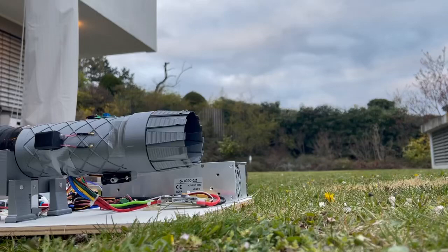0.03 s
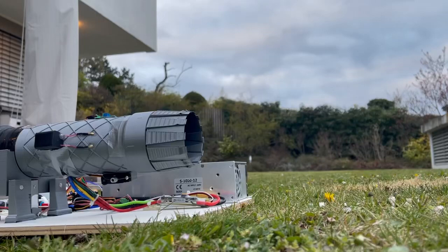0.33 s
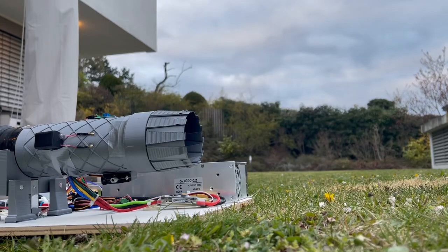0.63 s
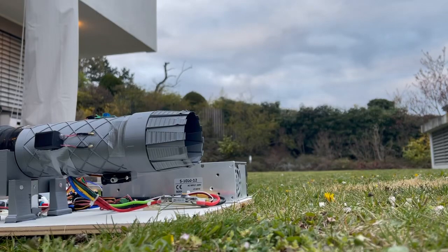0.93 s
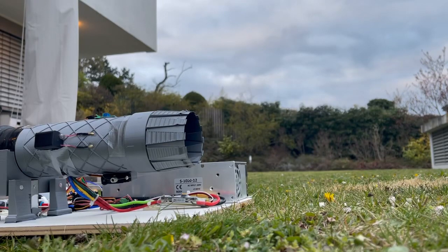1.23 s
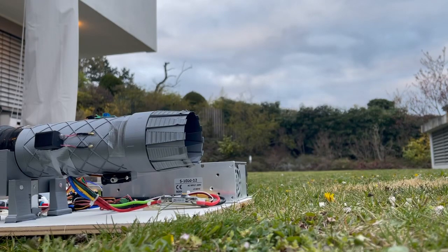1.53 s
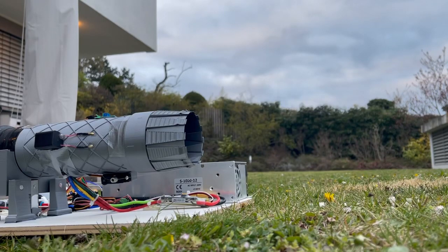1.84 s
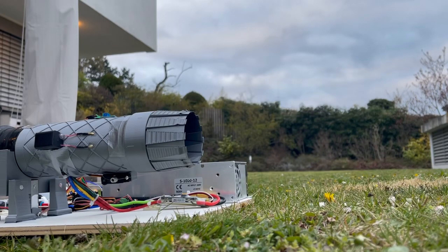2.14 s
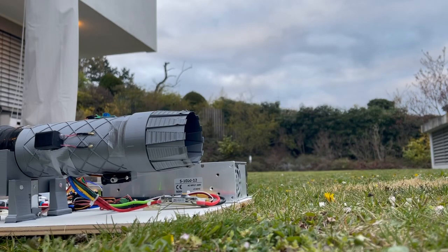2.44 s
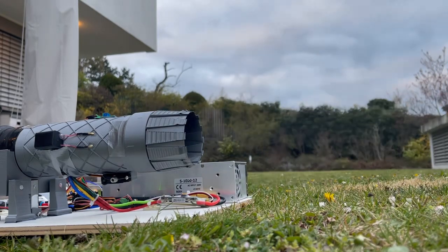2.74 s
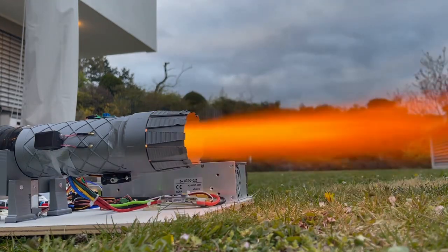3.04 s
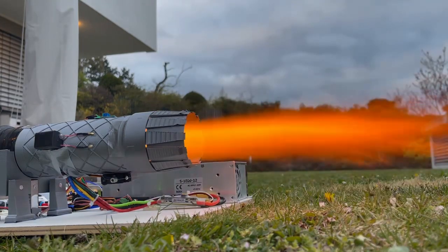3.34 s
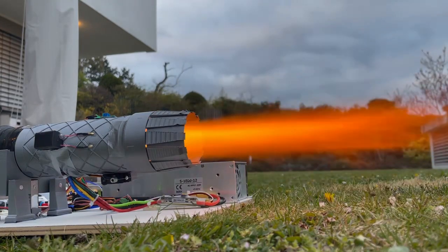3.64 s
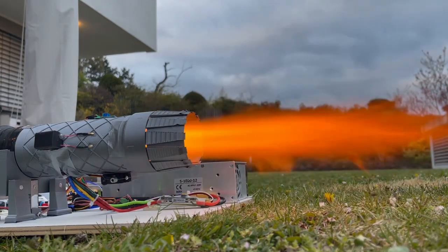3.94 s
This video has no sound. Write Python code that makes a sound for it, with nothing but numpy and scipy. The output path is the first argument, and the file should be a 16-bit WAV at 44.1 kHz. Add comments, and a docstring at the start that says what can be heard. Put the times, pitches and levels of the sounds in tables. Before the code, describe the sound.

Small jet engine humming and hissing, then two low thumps and a steady roaring flame.

```python
"""Model jet engine on a lawn

Its electric ducted fan hums, whines and hisses at a steady speed. Fuel catches once with a low
thump, goes out, then lights for good and roars from the nozzle while the whines weaken.
The whole sound dips after the first thump and stays lower after a flare of the flame."""
import sys
import numpy as np
from scipy import signal
from scipy.fft import rfft, irfft
from scipy.io import wavfile

SR = 44100
rng = np.random.default_rng(int(sys.argv[2]) if len(sys.argv) > 2 else 0)


def store_wav(level_fs):
    """Save 16-bit WAV to argv[1]."""
    pcm = np.round(np.clip(np.atleast_2d(level_fs), -1, 1) * 32767)
    wavfile.write(sys.argv[1], SR, pcm.T.astype(np.int16))


N = 176400
TIME_S = np.arange(N) / SR
BINS_HZ = np.maximum(np.arange(N // 2 + 1) * SR / N, 1)


def from_db(db):
    """Decibels to gain."""
    return 10 ** (np.asarray(db) / 20)


def over_time(rows):
    """Breakpoint curve at every sample."""
    return np.interp(TIME_S, *np.transpose(rows))


def over_hz(rows):
    """Each value column at every bin, interpolated in log frequency."""
    hz, *columns = np.transpose(rows)
    return [np.interp(np.log(BINS_HZ), np.log(hz), column) for column in columns]


def pan(left_minus_right_db):
    """Constant-power left and right gains."""
    gains = from_db(np.array([left_minus_right_db, -left_minus_right_db]).reshape(2, -1) / 2)
    return gains / np.sqrt(np.mean(gains ** 2, axis=0))


def drift(corner_hz):
    """Low-passed random wander, mean 0, rms 1."""
    slow = irfft(rfft(rng.standard_normal(N)) / (1 + (BINS_HZ / corner_hz) ** 2), N)
    return (slow - slow.mean()) / slow.std()


def turbulence(spectrum, image):
    """Noise with a given spectrum and stereo image, rms 1."""
    level_db, = over_hz(spectrum)
    balance_db, coherence = over_hz(image)
    coherence = np.clip(coherence, 0, 1)
    mid, side = rfft(rng.standard_normal((2, N)))
    stereo = np.sqrt(1 + coherence) * mid + np.sqrt(1 - coherence) * side * [[1], [-1]]
    noise = irfft(from_db(level_db) * pan(balance_db) * stereo, N)
    return noise / noise.std()


def ring(hits, pitch_hz, t60_s):
    """Damped sine started by each hit (start_s, level_db)."""
    impulses = np.full(N, 1e-18)
    for start_s, level_db in hits:
        impulses[int(start_s * SR)] += from_db(level_db)
    decay = np.exp(-np.log(1000) / (t60_s * SR))
    step_rad = 2 * np.pi * pitch_hz / SR
    return signal.lfilter([0, np.sin(step_rad)], [1, -2 * decay * np.cos(step_rad), decay ** 2], impulses)


# Rotor harmonics: shaft_order, level_db, left_minus_right_db
ROTOR_TONES = [(1, -24.5, 3.5), (2, -49, 1), (3, -38, 13), (4, -48, 4), (5, -53.5, 17), (6, -53, 3),
               (7, -60, -2), (8, -55, 11), (13, -60, 10), (14, -40.5, 2.5), (15, -54, 6), (16, -48, 5),
               (24, -39, -6)]

def fan_tones(shaft_hz=462.1, speed_spread=0.00034):
    """The rotor hums at its shaft rate; fluttering whines above it weaken once the flame stands."""
    speed_hz = shaft_hz * (1 + speed_spread * drift(corner_hz=3.1))
    shaft_rad = 2 * np.pi * np.cumsum(speed_hz) / SR
    light_s, settle_s, burning_db = 2.77, 0.089, -23
    whine_gain = from_db(burning_db * np.clip((TIME_S - light_s) / settle_s, 0, 1))
    tones = 0
    for order, level_db, balance_db in ROTOR_TONES:
        flutter_depth, gain = (0.032, 1) if order == 1 else (0.25, whine_gain)
        flutter = 1 + flutter_depth * (drift(13.4) + 1j * drift(13.4))  # amplitude and phase
        phase_rad = order * shaft_rad + 2 * np.pi * rng.random()
        tone = np.sqrt(2) * np.real(flutter * np.exp(1j * phase_rad))
        tones += from_db(level_db) * pan(balance_db) * gain * tone
    return tones


# Duct air spectrum: freq_hz, relative_density_db
DUCT_SPECTRUM = [(25, -17), (62, -6), (90, -9.5), (125, -13.5), (230, -12.5), (300, -9.5), (375, 1.4),
                 (490, 0.3), (700, -7), (1050, -7), (1250, -11), (1600, -11.5), (2250, -19), (2480, -16.5),
                 (2620, -12), (2900, -15), (3500, -19.5), (3950, -16.5), (4900, -15), (7000, -13),
                 (7700, -9), (9800, -8), (10450, -2), (10900, 0), (11450, -5), (11700, -19)]
# Duct air stereo image: freq_hz, left_minus_right_db, coherence
DUCT_IMAGE = [(70, -1.5, .95), (330, 2, .96), (620, 5.5, .87), (1200, 5, .82), (1650, 9, .45),
              (2050, 7, .15), (2700, 4, .65), (3900, 3, .68), (5300, 9, .52), (6450, 0, .9), (7200, 5, .65),
              (8000, 0, .97), (9400, 0, .85), (9950, 0, 1), (10350, 0, 1), (10800, 0, .97), (11200, 0, .75),
              (11600, 0, .98)]

def fan_rush(level_db=-22.5, flicker_db=0.76):
    """Air rushes through the duct, with a bright hiss on top."""
    return from_db(level_db + flicker_db * drift(corner_hz=28)) * turbulence(DUCT_SPECTRUM, DUCT_IMAGE)


# Flame strength: time_s, level_db
FLAME_LEVEL = [(2.54, -70), (2.565, -28), (2.579, -23), (2.587, -9.5), (2.599, -10), (2.608, -18),
               (2.635, -39), (2.67, -58), (2.745, -39), (2.763, -12), (2.771, -8), (2.83, -7.5), (3.0, -8),
               (3.025, -6.5), (3.06, -8), (3.3, -8.5), (3.42, -9), (3.55, -8.5), (3.65, -9), (4.0, -7.5)]
# Roar shaped by the flame tube: freq_hz, relative_density_db
FLAME_SPECTRUM = [(22, -40), (38, -19), (55, -6.5), (90, -5), (170, -4.5), (240, -1.2), (310, -2),
                  (470, 0.8), (590, -1), (730, -11.5), (860, -12.5), (1060, -8), (1200, -13.5), (1320, -21),
                  (1750, -25), (2100, -30), (2600, -34), (3850, -34.5), (4220, -30.5), (4600, -44),
                  (6200, -67), (9000, -32), (11000, -42)]
# Roar stereo image: freq_hz, left_minus_right_db, coherence
FLAME_IMAGE = [(60, -1.5, 0.98), (220, 1.8, 1), (530, 2, .99), (704, 0.5, 0.99), (960, 5.5, 1),
               (1310, 1.5, 0.94), (1630, 4, 0.84), (2110, -1, 1), (2900, 0.5, 0.69), (5000, 3, 0.76)]

def flame(split_hz=1100, sputter_db=0.67, flicker_db=1.12):
    """Turbulent burning: the whole roar flickers, its treble sputters faster."""
    roar = turbulence(FLAME_SPECTRUM, FLAME_IMAGE)
    body = irfft(rfft(roar) / (1 + (BINS_HZ / split_hz) ** 4), N)
    treble = (roar - body) * from_db(sputter_db * drift(corner_hz=90))
    level_db = over_time(FLAME_LEVEL) + flicker_db * drift(corner_hz=16.5)
    return (body + treble) * from_db(level_db)


# Gas swings at first catch, blowout and relight: start_s, pitch_hz, level_db, t60_s
GAS_THUMPS = [(2.581, 85, -5.5, 0.05), (2.609, 68, 0, 0.063), (2.77, 110, 0.5, 0.081)]
# Fuel pockets going off: start_s, level_db
FUEL_POPS = [(2.5837, -6), (2.5882, -8), (2.5962, -6), (2.7705, -8), (2.7790, -11), (3.0155, -5),
             (3.0265, -14)]
# Flame tube resonances: pitch_hz, gain_db, t60_s
TUBE_MODES = [(190, -12, 0.02), (330, 2.5, 0.029), (485, 0.5, 0.026), (1040, -35, 0.014),
              (1590, -20, 0.018)]

def ignition():
    """At both lightings the gas swings with a deep thump and fuel pops ring the flame tube."""
    thumps = sum(ring([(start_s, level_db)], pitch_hz, t60_s)
                 for start_s, pitch_hz, level_db, t60_s in GAS_THUMPS)
    pops = sum(from_db(gain_db) * ring(FUEL_POPS, pitch_hz, t60_s)
               for pitch_hz, gain_db, t60_s in TUBE_MODES)
    return -pan(left_minus_right_db=-1.0) * (thumps + pops)


# Dips of the whole sound: time_s, gain_db
OVERALL_GAIN = [(2.585, -0.5), (2.605, -4.5), (2.66, -5.5), (2.76, -3.5), (2.92, -4), (3.015, -3),
                (3.04, -7), (3.5, -7.5), (4.0, -8)]

def scene():
    """Fan and flame close by in open air."""
    engine = fan_tones() + fan_rush() + flame() + ignition()
    return engine * from_db(over_time(OVERALL_GAIN))


# Phase between the two microphone ports: freq_hz, left_lead_rad
PORT_LEAD = [(1900, 0), (2300, .3), (2900, 1.2), (3700, .4), (5200, .6), (6500, -.1), (7400, .3), (8000, 0),
             (8900, 0), (9100, -1.0), (9500, -1.7), (9750, -2.5), (10000, -3.1), (10300, -3.2),
             (10550, -3.7), (11000, -4.3), (11300, -6.1)]

def record(dry, start_s=0.036, low_cut_hz=44, ceiling=0.95, high_cut_hz=11650):
    """The ports shift the treble in phase; deep bass is cut, peaks are rounded, the top is cut."""
    lead_rad, = over_hz(PORT_LEAD)
    port_shift = np.exp(.5j * lead_rad * np.array([[1], [-1]]))
    x = irfft(rfft(dry) * port_shift, N) * (TIME_S > start_s)
    x = signal.sosfilt(signal.butter(2, low_cut_hz, "high", fs=SR, output="sos"), x)
    x = x / (1 + (x / ceiling) ** 4) ** .25
    return signal.sosfilt(signal.ellip(10, .1, 90, high_cut_hz, fs=SR, output="sos"), x)


dry = scene()
out = record(dry)
store_wav(out)
```